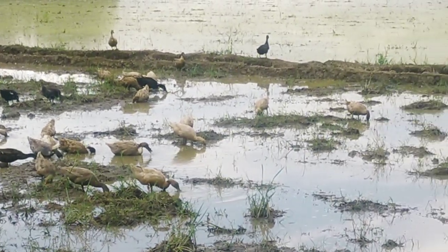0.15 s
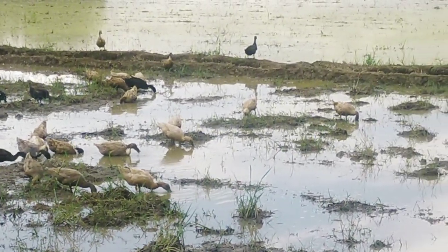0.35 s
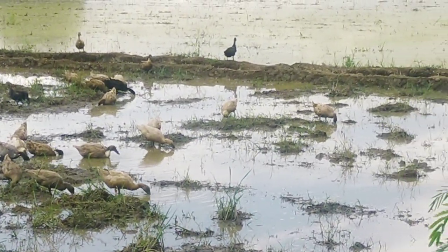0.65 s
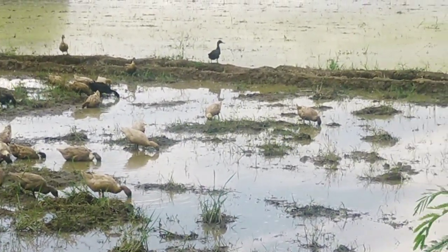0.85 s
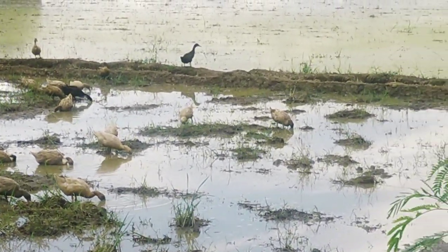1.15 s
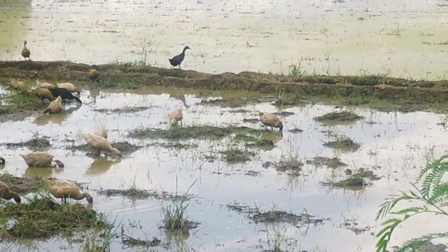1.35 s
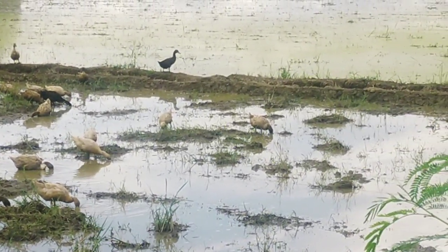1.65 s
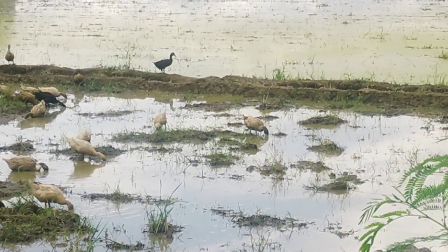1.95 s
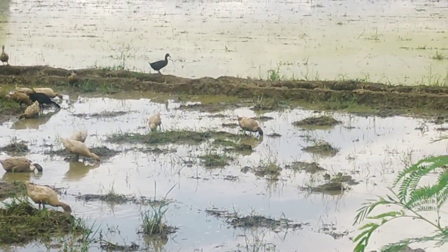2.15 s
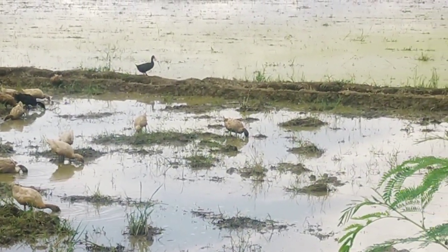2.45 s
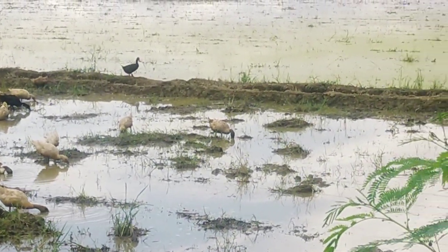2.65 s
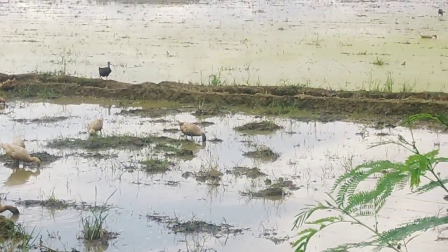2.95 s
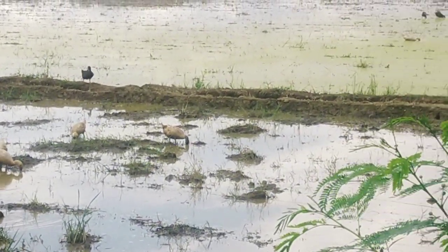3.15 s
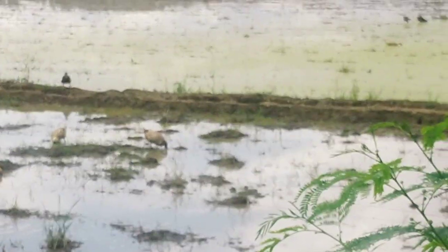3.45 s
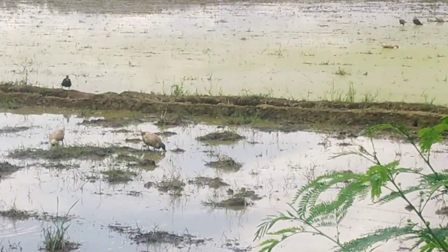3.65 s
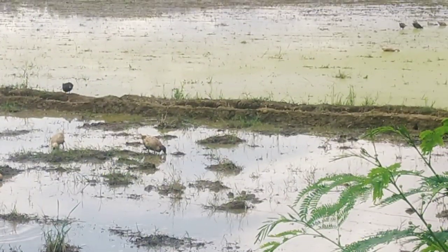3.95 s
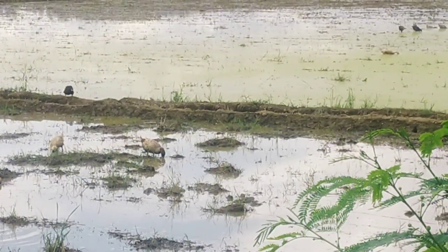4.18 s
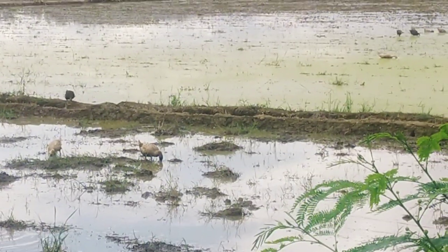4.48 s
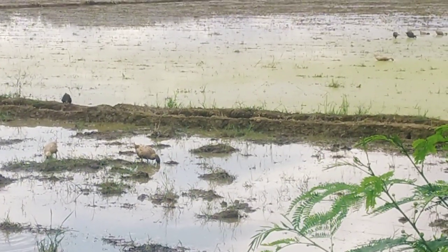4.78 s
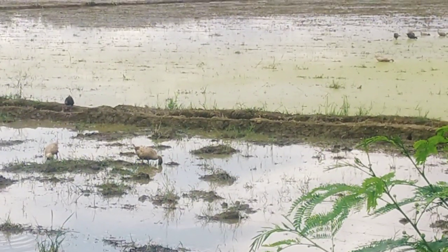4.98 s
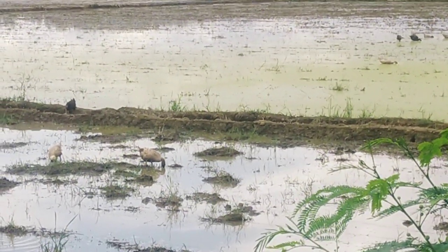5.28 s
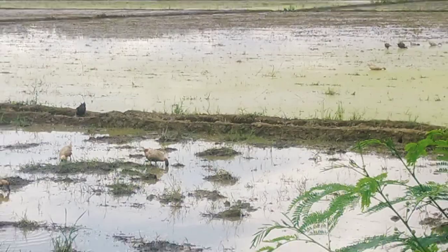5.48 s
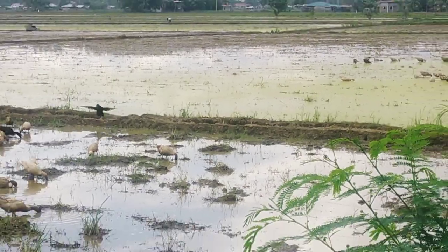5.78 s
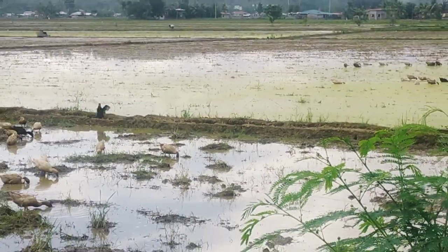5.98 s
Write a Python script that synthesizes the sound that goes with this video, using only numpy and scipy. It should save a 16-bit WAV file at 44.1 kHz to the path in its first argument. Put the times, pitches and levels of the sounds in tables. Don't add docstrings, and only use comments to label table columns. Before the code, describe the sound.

Wet bill smacks, brief low quacks and a fading single-cylinder chug over faint traffic, ending with a motorbike rushing close by.

```python
import sys
import numpy as np
from scipy import signal
from scipy.fft import rfft, irfft, next_fast_len
from scipy.io import wavfile
from scipy.ndimage import uniform_filter1d, map_coordinates

SR = 44100
rng = np.random.default_rng(int(sys.argv[2]) if len(sys.argv) > 2 else 0)


def invert_db(level):
    return 10 ** (np.asarray(level, dtype=float) / 20)


def log_audio(samples):
    frames = np.atleast_2d(samples).T
    limited = np.clip(frames, -1, 1)
    pcm = np.round(limited * 32767).astype(np.int16)
    wavfile.write(sys.argv[1], SR, pcm)


N = 269892
T = np.arange(N) / SR

# time_s, rate_hz
BIKE_RATE = [(1.5, 46.29), (2.5, 46.4), (3.5, 46.04), (4.3, 46.09), (5.0, 45.69), (5.4, 45.5),
             (5.65, 45.66), (5.8, 45.26), (5.95, 44.07), (6.12, 42.66)]
# multiple_of_firing_rate, approaching_db, abreast_db, past_db
BIKE_ORDERS = [(1, -8, -7, 1.5), (2, 2, 1, 5), (3, -6, -7.5, -5), (4, -5.5, -17, 3), (5, -2.5, -2.5, 2),
               (6, -6.5, -5.5, -5.5), (7, -16, -10, -8.5), (8, -21, -20, -9), (9, -25.5, -17, -33),
               (10, -31, -17, -21), (11, -20, -38, -28)]
# multiple_of_firing_rate, under_whirr_db, under_rattle_db
GEARS = [(11.98, -23, -35), (14.16, -18, -46), (15.94, -18.5, -33), (20.08, -23, -33), (22.07, -19, -37),
         (28.03, -14, -34), (30.65, -19, -25), (33.2, -26, -31), (35.15, -16, -9.5), (37.07, -18, -17.5),
         (39.2, -20, -40), (40.9, -22, -17), (42.8, -17.5, -27), (45.85, -30, -14), (46.85, -32, -15),
         (47.9, -23, -16), (49.65, -19, -21), (51.45, -20, -21), (53.5, -30, -21), (57.9, -37, -24),
         (68.2, -24.5, -30), (78, -24, -28), (80, -33, -28), (95.3, -27, -29)]
# frequency_hz, density_db_per_hz
WHIRR = [(180, -69), (300, -3.5), (434, -6.5), (636, -1), (858, -10), (1100, -6), (1370, 0), (1820, -5.5),
         (2030, -1.5), (2900, -16), (3630, -20.5), (4610, -43.5), (5200, -20.5), (6760, -29), (11400, -120)]
HISS = [(2000, -22), (2700, -6), (3300, -7), (4000, -11.5), (4800, -14), (5600, -6), (6500, -6.5),
        (7500, -10), (8900, -20.5), (10300, -14), (12600, -3), (14000, -9.5), (15700, -10)]
RATTLE = [(300, -43), (500, -23), (650, -26), (850, -18), (1100, -19), (1330, -10.5), (1520, -3),
          (1720, -7.5), (2020, -3.5), (2300, -6), (2600, -13), (3200, -20.5), (4200, -50)]
FINS = [(2800, -25), (3300, -13), (3620, -1.5), (3950, -6), (4300, 0.5), (4550, -8), (4900, -6),
        (5500, -25)]
# time_s, rate_hz
CHUG_RATE = [(0.0, 19.25), (0.5, 19.23), (1.1, 19.27), (1.25, 19.89), (1.45, 20.23), (2.0, 20.27),
             (2.6, 20.22), (3.3, 20.19), (4.2, 19.87)]
# multiple_of_firing_rate, level_db
CHUG_ORDERS = [(2, -4.5), (3, -41), (4, -3), (5, 3), (6, 2.5), (7, 2.5), (8, -3), (9, -10.5), (10, -28),
               (11, -19), (12, -19), (13, -20), (14, -23), (15, -12)]
# frequency_hz, density_db_per_hz
CLATTER = [(1000, -30), (1500, 5), (2200, 3), (2800, 5.5), (3500, -6), (4100, -10), (5000, -30)]
# start_s, length_s, pitch_hz, level_db, bill_opening_db
QUACKS = [
    (.70, .09, 331, -54, -4),
    (.98, .065, 333, -52, -7),
    (1.47, .095, 307, -50.5, -18),
    (1.736, .098, 306, -43, 2),
    (3.02, .07, 283, -49, -8),
]
# frequency_hz, width_hz, level_db
THROAT = [(1215, 380, 0)]
BILL = [(1760, 180, 4), (2370, 390, -5), (2690, 330, -6)]
# time_s, peak_db, frequency_hz
SMACKS = [(0.4349, -39, 3040), (0.5247, -36, 2740), (0.5731, -34, 2760), (0.6165, -40, 2700),
          (0.6699, -44, 2630), (0.7234, -46, 3080), (0.828, -41, 2820), (0.9373, -40, 2720),
          (1.096, -40, 2400), (1.1423, -39, 2900), (1.924, -49, 2390), (2.0304, -49, 2360)]
# time_s, peak_db, frequency_hz
STONE = [
    (5.5697, -25.5, 1427),
]
# time_s, peak_db
TICKS = [(0.3745, -44), (0.9604, -52), (1.3834, -53), (1.6337, -41), (2.0053, -49), (2.5834, -52),
         (2.6654, -50), (2.8639, -43), (2.9554, -53), (3.6735, -42), (3.9504, -46), (4.2394, -46),
         (4.4358, -41), (4.4747, -39), (4.6894, -44), (4.7915, -38)]
# frequency_hz, density_db_per_hz
FIELD_TONE = [(180, -25), (300, -12.5), (454, -11.5), (722, 0), (1110, -8.5), (1290, 0), (1790, -8),
              (1980, -8), (2760, -11.5), (4240, -14.5), (5010, -25.5), (6530, -15), (9240, -30.5),
              (12000, -22), (15700, -27.5)]
RUMBLE = [(4, -15), (20, -13), (30, -11), (45, 2.5), (65, -6), (120, -0.5), (250, -6), (330, -12),
          (450, -15), (600, -46)]

SPEED, GAP_M = 14, 3.1
# loudest_s, level_db, beam (under 0 forwards, over 0 sideways), loss_db_per_10_m, past_shade_db
EXHAUST, FRAME = (5.79, -26.8, -.04, .1, -1), (5.8, -38, .1, .3, 1.5)
INTAKE, CHAIN = (5.45, -36.2, -.78, 2.5, -1), (5.95, -24.5, 3.3, .1, 9)
FAN, TYRES = (5.865, -29.2, .06, 1.5, -4), (5.76, -36.5, .6, .1, -4)
CASING, COOLING = (5.91, -21.8, 2.3, .1, 2), (5.855, -19, 3.6, .1, -2)
FLASH_S, FLASH_LENGTH_S, FLASH_DB = 5.94, .03, 5.5
CHUG_DB, CHUG_DOUBLES_S, CHUG_LOSS_DB = -37, 2.5, 1.6
ATTACK, RELEASE, EDGE_DB, SAG, SCOOP, BILL_SHUT_DB, BILL_LEAK_DB = .1, .1, -10, .34, .075, -16, -2.5
ROUGH_HELD, ROUGH_EDGE = .21, .4
WASH_DB, RUMBLE_DB, FIZZ_DB = -52, -57, -63.5
CHUG_WASH_DB, CHUG_RUMBLE_DB, CHUG_FIZZ_DB = -13.5, -10, -26


def motorbike():
    cycle = np.cumsum(curves(BIKE_RATE)[0]) / SR - .82
    past = np.clip((T - 5.75) / 0.34, 0, 1)
    swell = np.cos(2 * np.pi * (cycle - .25))
    whirr_db = together(part_db(INTAKE), part_db(CHAIN))
    flash = np.exp(-((T - FLASH_S) / FLASH_LENGTH_S) ** 2)
    rattle_db = part_db(CASING) + FLASH_DB * flash
    noises = bike_whirr(cycle, swell, whirr_db - 8.3 * past) + bike_hiss(swell)
    noises = noises + bike_casing(cycle, swell, rattle_db)
    return bike_exhaust(cycle) + noises + bike_gears(cycle, past, whirr_db, rattle_db)


def bike_exhaust(cycle):
    pulse = np.zeros(N)
    for k, *dbs in BIKE_ORDERS:
        gain = np.interp(T, (5.3, 5.78, 6.06), invert_db(np.array(dbs)))
        pulse -= gain * np.sin(2 * np.pi * k * cycle)
    return invert_db(part_db(EXHAUST) - 1.5) * uneven(cycle, scatter_db=0.5) * pulse


def bike_whirr(cycle, swell, whirr_db):
    locked = 0.55 * repeating(cycle, count=9) + 0.88 * patchy(1.8)
    return invert_db(whirr_db - 2) * coloured(invert_db(2.5 * swell) * locked, WHIRR)


def bike_hiss(swell):
    hiss_db = part_db(FAN)
    hiss = coloured(invert_db(1.8 * swell + 2.3 * wobble(250)) * patchy(1.5), HISS)
    top = filtered(hiss, lambda hz: 1 / (1 + (9500 / (hz + 1)) ** 8))
    lost_db = 0.81 * np.minimum(hiss_db + 24.5, 0)
    return invert_db(hiss_db - 1) * (hiss - top + invert_db(lost_db) * top)


def bike_casing(cycle, swell, rattle_db):
    noise = 0.51 * repeating(cycle, count=40) + 1.3 * patchy(1.56)
    shakes = invert_db(1.7 * swell + 1.5 * wobble(150)) * noise
    rattle = invert_db(rattle_db - 2.0) * coloured(shakes, RATTLE)
    fins = invert_db(part_db(COOLING) - 9.5) * coloured(shakes, FINS)
    return rattle + fins


def bike_gears(cycle, past, whirr_db, rattle_db):
    far = invert_db(whirr_db + 3.2 - 20 * past)
    near = invert_db(rattle_db + 2.5)
    shaky = 0.5 + .3 * past
    close = .008 * invert_db(part_db(CASING) - CASING[1])
    song = np.zeros(N)
    for k, far_db, near_db in GEARS:
        gain = (far * invert_db(far_db) + near * invert_db(near_db)) * (1 + 0.35 * wobble(4.5))
        song += gain * np.sin(2 * np.pi * k * cycle + (shaky + k * close) * wobble(12))
    return song


def part_db(part):
    loudest_s, db, beam, loss_db, shade_db = part
    metres = np.hypot(SPEED * (T - loudest_s), GAP_M)
    past = np.clip((T - loudest_s) * SPEED / GAP_M, 0, 1)
    spreading_db = (1 + beam) * 20 * np.log10(metres / GAP_M)
    return db - spreading_db - loss_db * (metres - GAP_M) / 10 + shade_db * past


def chug():
    cycle = np.cumsum(curves(CHUG_RATE)[0]) / SR - .97
    thump = np.zeros(N)
    for k, db in CHUG_ORDERS:
        thump += invert_db(db) * np.sin(2 * np.pi * k * cycle + .06 * (k - 7) ** 2)
    since_firing = (cycle + .05 * wobble(9)) % 1
    tick = invert_db(-60 * since_firing / .7) * uneven(cycle, scatter_db=1.6)
    clatter = invert_db(-17 - 3.3 * T) * coloured((tick + 0.45) * patchy(1.1), CLATTER)
    return invert_db(chug_db()) * (uneven(cycle, scatter_db=1) * unit(thump) + clatter)


def chug_db():
    return CHUG_DB - 20 * np.log10(1 + T / CHUG_DOUBLES_S) - CHUG_LOSS_DB * T


def quacks():
    inner, outer = np.zeros(N), np.zeros(N)
    flutter = 1 + .003 * wobble(90)
    for start, length, *call in QUACKS:
        on = (T > start) & (T < start + length)
        pitch, db, rough, open_db = call_shape((T[on] - start) / length, *call)
        cycle = np.cumsum(pitch * flutter[on]) / SR
        pulses = sum(np.cos(2 * np.pi * k * cycle) for k in range(2, 12))
        air = (1 + np.cos(2 * np.pi * cycle)) * rng.standard_normal(N)[on] * 5
        voice = invert_db(db + 3.0) * ((1 - rough) * pulses + rough * air)
        inner[on] = voice
        outer[on] = invert_db(open_db) * voice
    return resonant(inner, THROAT) + resonant(outer, BILL)


def call_shape(u, pitch_hz, db, open_db):
    held = np.minimum(np.minimum(u / ATTACK, (1 - u) / RELEASE), 1)
    opened = np.sin(np.pi * u) ** 2
    sag = SAG * np.minimum(u, .88) ** 4
    scoop = SCOOP * invert_db(open_db) * np.clip((.26 - u) / .11, 0, 1)
    pitch = pitch_hz * (1 - sag - scoop)
    level = db + EDGE_DB * (1 - held) + BILL_LEAK_DB * invert_db(open_db) * opened
    rough = ROUGH_EDGE + (ROUGH_HELD - ROUGH_EDGE) * held
    return pitch, level, rough, open_db + BILL_SHUT_DB * (1 - opened)


def resonant(x, modes):
    def response(f):
        total = 0
        for k, (centre, width, db) in enumerate(modes):
            mode = 1j * f * width / (centre * centre - f * f + 1j * f * width)
            total = total + (-1) ** k * invert_db(db / 2) * mode
        return total ** 2
    return filtered(x, response)


def dabbling():
    smack, tick = np.zeros(N + 900), np.zeros(N + 900)
    t = np.arange(900) / SR
    for s, db, hz in SMACKS:
        tone = sum(np.sin(2 * np.pi * ratio * hz * t + 6 * rng.random()) for ratio in (.68, .9, 1, 1.16, 1.35))
        smack[round(s * SR):][:900] += invert_db(db - 4 - 60 * t / 0.014) * (1 - np.exp(-t / 0.0011)) * tone
    for s, db, hz in STONE:
        ring = np.sin(2 * np.pi * 1.04 * hz * t)
        smack[round(s * SR):][:900] += invert_db(db + 5 - 60 * t / .06) * (1 - np.exp(-t / .0006)) * ring
    for s, db in TICKS:
        tick[round(s * SR):][:900] += invert_db(db + 3 - 60 * t / .0035) * rng.standard_normal(900)
    return smack[:N] + filtered(tick[:N], lambda hz: hz ** 4 / (hz ** 4 + 10500.0 ** 4))


def field():
    wash_db = together(WASH_DB, chug_db() + CHUG_WASH_DB, part_db(TYRES))
    rumble_db = together(RUMBLE_DB, chug_db() + CHUG_RUMBLE_DB, part_db(FRAME))
    fizz_db = together(FIZZ_DB, chug_db() + CHUG_FIZZ_DB)
    wash = invert_db(wash_db) * coloured(patchy(1.73), FIELD_TONE)
    rumble = invert_db(rumble_db) * coloured(patchy(1.2), RUMBLE)
    strokes = invert_db(3 * np.tanh(1.2 * wobble(70)) + 3.9 * wobble(350)) * patchy(1.6)
    bright = filtered(strokes, lambda hz: hz ** 2 / (hz ** 2 + 5000 ** 2))
    sieve = invert_db(fizz_db) * coloured(bright, FIELD_TONE)
    return water_spits() + wash + sieve + rumble


def water_spits():
    drops = (rng.random(N) < 40 / SR) * rng.exponential(1, N)
    bursts = np.convolve(drops, invert_db(-60 * T[:300] / .005))[:N] * rng.standard_normal(N)
    return invert_db(-53) * filtered(bursts, lambda hz: hz ** 6 / (hz ** 6 + 13000.0 ** 6))


def together(*dbs):
    return 10 * np.log10(sum(invert_db(db) ** 2 for db in dbs))


def unit(x):
    return x / np.sqrt(np.mean(x ** 2) + 1e-20)


def curves(rows):
    s, *cols = np.transpose(rows)
    return [np.interp(T, s, c) for c in cols]


def wobble(rate):
    coarse = T[::16]
    knots = rng.standard_normal(int(N * rate / SR) + 4)
    return np.interp(T, coarse, map_coordinates(knots, [coarse * rate]))


def filtered(x, response):
    m = next_fast_len(N + 8192)
    return irfft(rfft(x, m) * response(np.fft.rfftfreq(m, 1 / SR)), m)[:N]


def coloured(x, spectrum):
    f, db = np.transpose(spectrum)
    return unit(filtered(x, lambda hz: invert_db(np.interp(np.log(hz + 1), np.log(f), db, -120, -120))))


def patchy(patchy_db):
    z = signal.stft(rng.standard_normal(N + 512), nperseg=512)[2]
    patches = uniform_filter1d(uniform_filter1d(rng.standard_normal(z.shape), 6, 0), 8, 1)
    return unit(signal.istft(z * invert_db(patchy_db * unit(patches)), nperseg=512)[1][:N])


def uneven(cycle, scatter_db):
    return invert_db(scatter_db * map_coordinates(rng.standard_normal(int(cycle[-1]) + 4), [cycle + 1]))


def repeating(cycle, count):
    patterns = rng.standard_normal((count + 1, 961))
    return unit(map_coordinates(patterns, [T / T[-1] * count, cycle % 1 * 960], order=1))


def scene():
    return (motorbike() + chug() + quacks() + dabbling() + field())[None]


def band_limit(x):
    return signal.sosfilt(signal.butter(12, 16460, fs=SR, output="sos"), x)


def record(dry):
    top_hz = 15750
    mix = filtered(dry[0], lambda hz: hz < top_hz)[None]
    return band_limit(mix)


dry = scene()
out = record(dry)
log_audio(out)
```